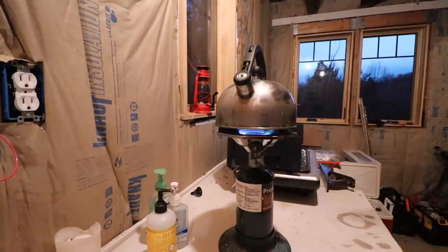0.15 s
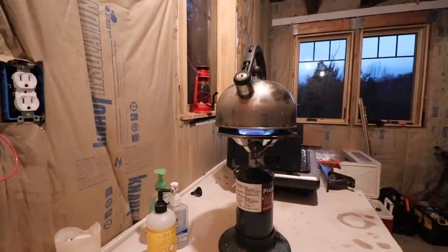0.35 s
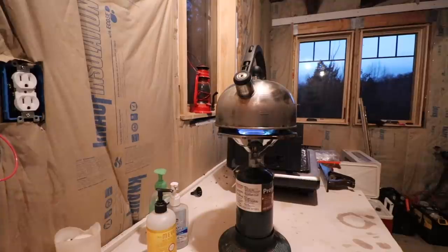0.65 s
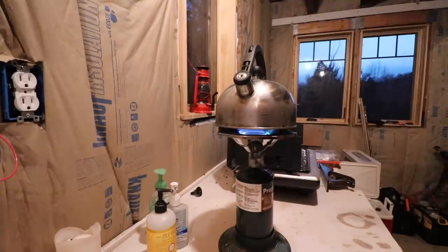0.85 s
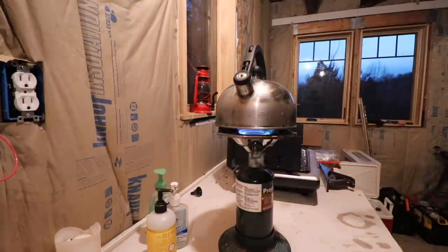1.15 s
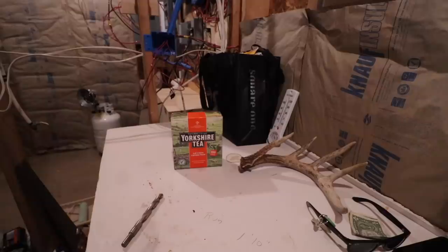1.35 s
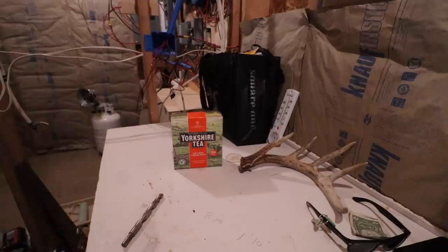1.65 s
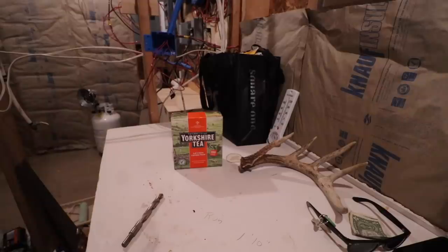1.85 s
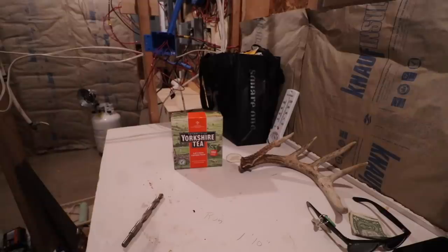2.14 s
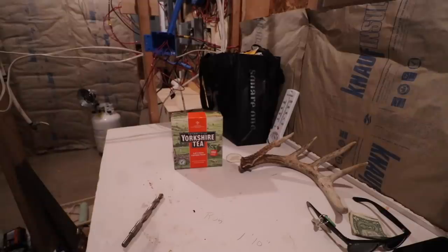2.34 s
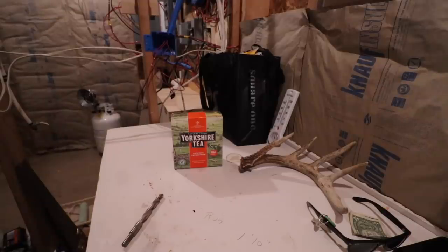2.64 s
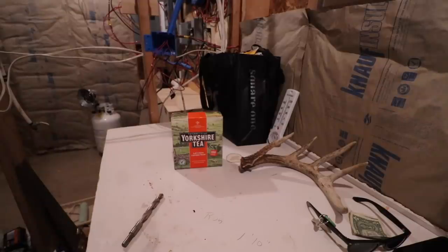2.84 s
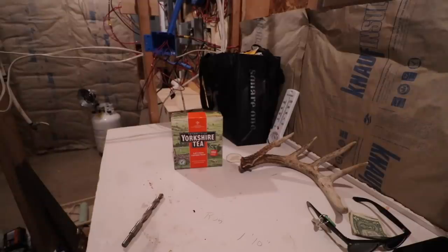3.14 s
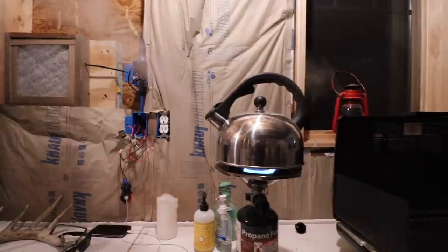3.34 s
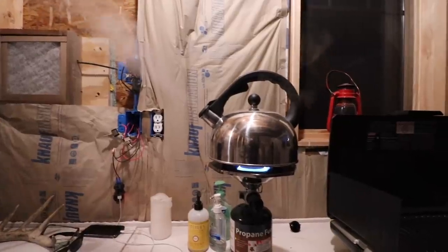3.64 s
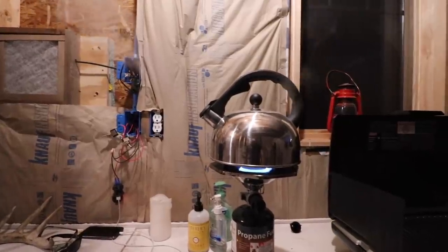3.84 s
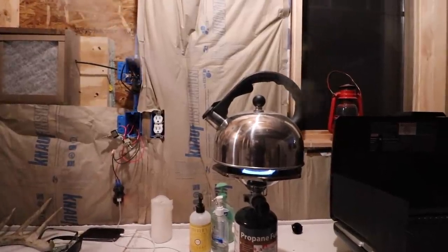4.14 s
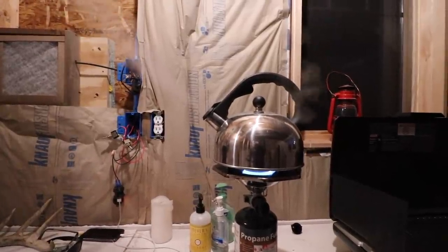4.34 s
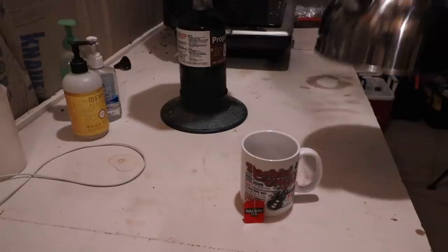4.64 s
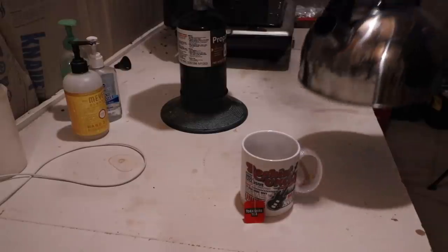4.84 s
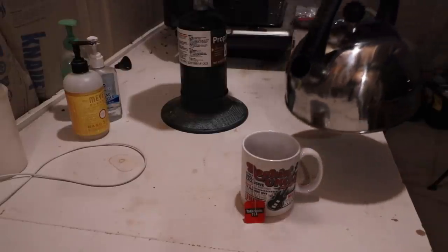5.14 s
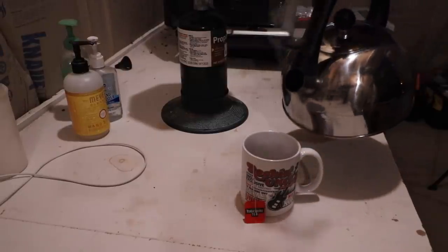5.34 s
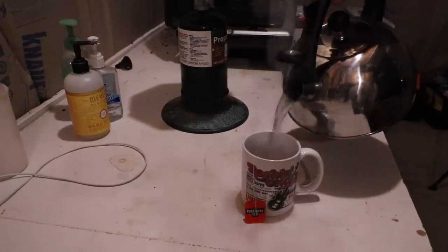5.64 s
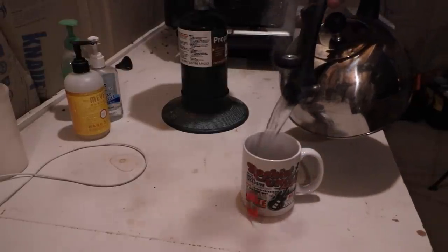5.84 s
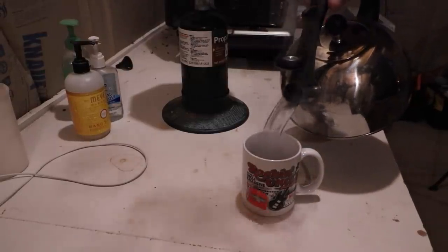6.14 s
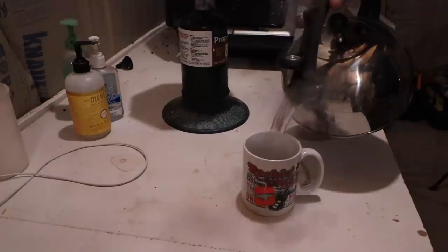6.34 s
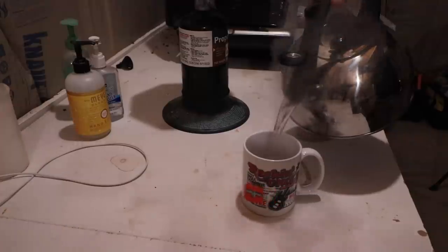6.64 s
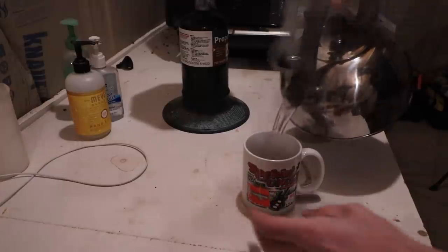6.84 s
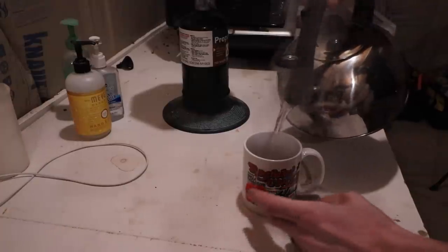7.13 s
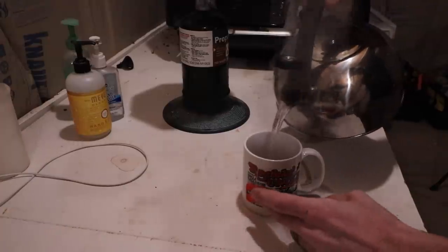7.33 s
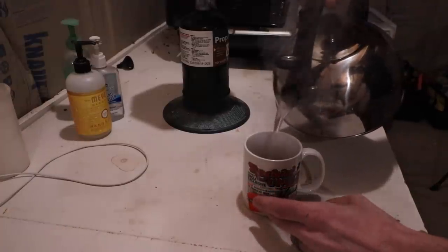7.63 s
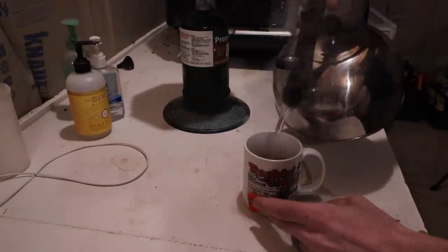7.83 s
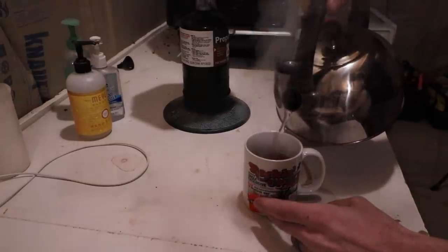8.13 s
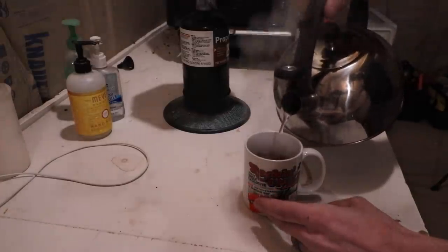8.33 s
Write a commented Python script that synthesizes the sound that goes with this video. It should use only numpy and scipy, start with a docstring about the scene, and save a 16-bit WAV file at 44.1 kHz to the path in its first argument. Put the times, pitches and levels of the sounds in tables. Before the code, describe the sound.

A gas burner roars, a kettle whistles shrilly, then sizzles as hot water is poured gurgling into a mug.

```python
"""A gas flame roars under a steel kettle, first close by, then from across the table in a padded cabin.
The swirling flame flutters in the bass while the gas jet hisses. Next the kettle boils, and steam
sings a wavering whistle in the spout cap. Last, the hot kettle sizzles, spits steam as it tips and
fills a mug: bubbles gurgle and plop, rising in pitch as the air space above the water gets shorter.
Dull knocks come through the table and the mug. The sound is in stereo."""
import sys
import numpy as np
from scipy import signal
from scipy.fft import rfft, irfft, next_fast_len
from scipy.io import wavfile
from scipy.ndimage import uniform_filter1d, map_coordinates

SR = 44100
rng = np.random.default_rng(int(sys.argv[2]) if len(sys.argv) > 2 else 0)


def int16_out(signal):
    """Quantize to a 16-bit WAV file."""
    q = np.round(np.clip(np.atleast_2d(signal).T, -1, 1) * 32767)
    wavfile.write(sys.argv[1], SR, q.astype(np.int16))


N = 373968

# When the far flame, the boil and the pouring part begin: start_s
PART_STARTS = [1.33, 3.333, 4.69]
# Tone colours, or how strong each noise is from bass to treble: pitch_hz, level_db
MURMUR_COLOUR = [(20, -8), (60, -2.5), (160, -1), (320, -4.5), (1500, -41)]
NEAR_FLAME_COLOUR = [(20, -25), (116, 0), (324, -1.5), (428, -11), (909, -12), (2040, -27.5), (2380, -21.5),
                     (2770, -27), (3010, -22), (4840, -23.5), (6750, -25), (7980, -27.5), (15600, -40)]
FAR_FLAME_COLOUR = [(20, -18.5), (122, -0.5), (259, -1), (466, -18), (688, -7.5), (1820, -20.5),
                    (3560, -21), (3870, -19.5), (5720, -18), (6570, -23.5), (7760, -20.5), (9180, -28),
                    (12100, -40.5), (15600, -37.5)]
SIZZLE_COLOUR = [(20, -23.5), (259, -6), (492, -6), (860, -11), (1460, -11), (2100, -12.5), (3180, -8),
                 (9700, -7.5), (15600, -19)]
SPIT_COLOUR = [(300, -14), (900, -11.5), (1650, -1), (2170, -13.5), (2550, 0), (3900, -3), (5500, -13),
               (10000, -9.5), (13000, -29)]
STEAM_COLOUR = [(20, -28.5), (130, -8), (270, -1.5), (500, -12), (1000, -15), (1700, -20.5), (2200, -9),
                (3000, -19), (3900, -7.5), (4900, -1.5), (6000, -19), (8000, -14), (10500, -26.5),
                (13000, -31), (14000, -62)]
# Pitches at which the jet and the kettle ring: pitch_hz, width_hz, boost_db
NEAR_FLAME_RINGS = [(3690, 60, 3.1), (5330, 127, 9.3), (5470, 120, 6), (5560, 80, 8.6), (7640, 540, 7.6),
                    (8270, 510, 8.4), (9750, 340, 8.4), (11860, 360, 11)]
FAR_FLAME_RINGS = [(572, 418, 11.8), (3850, 240, 8.6), (4480, 130, 7), (5750, 370, 4.5), (7840, 230, 7.6),
                   (10200, 200, 9.2), (12100, 750, 15.2)]
SIZZLE_RINGS = [(814, 220, 9.5), (1270, 190, 6), (1664, 37, 13), (1795, 60, 10), (2504, 170, 7.5),
                (2820, 90, 5.5), (3010, 110, -2), (4130, 870, 4), (8060, 4300, 4)]
STEAM_RINGS = [(714, 60, 9.4), (1399, 170, 9.9)]
# How alike left and right sound: pitch_hz, likeness (1 means the same)
NEAR_LIKENESS = [(60, 1), (640, 0.94), (1400, 0.39), (3100, 0.5), (15000, 0.055)]
FAR_LIKENESS = [(60, 0.99), (700, 0.95), (1400, 0.44), (3000, 0.2), (15000, .05)]
STEAM_LIKENESS = [(60, 0.99), (500, 1), (8000, 0.065)]
POUR_LIKENESS = [(60, 0.75), (380, 0.58), (2380, 0.44), (15000, 0.052)]
# Loudness of the cabin's murmur: time_s, level_db
MURMUR_LEVELS = [(4.69, -61), (6.3, -60.5), (7, -56), (8.48, -62)]
# Knocks through table and mug: start_s, level_db, pitch_hz, edge_db (added to level_db)
KNOCKS = [(4.691, -5.5, 276, -31), (4.737, -15.5, 245, -33), (4.752, -15.5, 322, -37),
          (4.763, -14.5, 261, -36), (4.773, -19, 179, -28), (6.578, -31, 334, -2), (6.661, -20, 367, -8),
          (6.751, -21.5, 340, -4), (6.946, -24, 320, 0), (6.954, -25, 177, 1.5)]
# Spits of steam: peak_s, level_db, hold_s
SPITS = [(5.276, -41, 0.018), (5.512, -37, 0.093)]
# Two dribbles, two gushes, the thinning stream and a last trickle:
# peak_s, gurgle_db, hold_s, fall_db_per_s, spray_db, slosh_db (both added to gurgle_db)
SURGES = [(5.826, -54, 0.015, 150, 6.5, -12), (6.07, -55, 0.025, 150, 6, -3),
          (6.21, -47, 0.045, 200, 1, -5), (6.315, -51, 0.075, 70, 6.5, 2.5),
          (6.473, -57.5, 0.081, 12, 3, 4.5), (7.518, -55, 0.035, 26, -8, -11)]
# The loudest single drops: start_s, splat_db, bubble_db, bubble_hz
DROPS = [(5.828, -24, -35.5, 790), (5.838, -28, -34, 800), (5.857, -30, -42, 850), (6.085, -23, -29, 2950),
         (6.1216, -42.5, -31, 830), (6.135, -37, -33, 850), (6.22, -15.5, -30, 990), (6.232, -24, -26, 900),
         (6.238, -23.5, -38, 930), (6.2866, -24.5, -25.5, 720), (6.314, -34, -36, 920),
         (6.3274, -30, -31, 3030), (6.341, -21, -26.5, 1110), (6.368, -23, -30, 1010),
         (6.379, -26, -30, 2900), (6.387, -32, -37, 2620), (6.413, -30, -27.5, 3250),
         (6.496, -45, -36, 1010), (6.548, -36, -47, 2900), (6.636, -42, -29, 3940), (6.5767, -34, -34, 880),
         (6.585, -38, -28.5, 1210), (6.674, -36, -39, 990), (6.7708, -26, -37, 2880),
         (6.9348, -34, -35, 1280), (7.387, -30, -40.5, 1620), (7.502, -40, -39, 1640),
         (7.523, -44, -42, 1670), (7.592, -43, -38, 1470), (7.653, -46, -36, 1700), (7.774, -38, -36, 1670),
         (8.1868, -35, -40.5, 1660)]
# The whistle's wavering note: time_s, pitch_hz
WHISTLE_PITCH = [(3.34, 4351), (3.43, 4415), (3.462, 4440), (3.496, 4415), (3.645, 4355), (3.825, 4438),
                 (3.88, 4406), (4.048, 4368), (4.1, 4400), (4.208, 4390), (4.234, 4410), (4.26, 4400),
                 (4.34, 4410), (4.395, 4350), (4.59, 4394), (4.63, 4428), (4.68, 4410)]
# Fainter notes above it: pitch_multiple, relative_db
OVERTONES = [(2, -21), (3, -41.5)]
# Brief dips in the whistle: middle_s, depth_db, half_length_s
WHISTLE_DIPS = [(3.455, 5.5, 0.014), (3.695, 1.5, 0.022), (3.746, 9.5, 0.0039), (3.817, 9.5, 0.0047),
                (4.233, 5, 0.0047), (4.306, 5.5, 0.0045), (4.564, 2.5, 0.017), (4.662, 13.5, 0.0035)]
# The steam plume swings left: time_s, left_over_right_db
WHISTLE_PAN = [(3.83, 0), (3.89, 2.7), (4.68, 4)]
# The spout's lower note flares up: middle_s, peak_db, half_length_s
LOW_NOTE_FLARES = [(3.404, -49.5, 0.017), (3.814, -51.5, 0.01), (3.92, -41.5, 0.014), (4.264, -57, 0.015)]

FAR_S, BOIL_S, POUR_S = PART_STARTS
EMPTY_HZ, FULL_HZ, FILL_S = 820, 1660, (5.9, 7.42)  # the mug's note, and when it climbs
SPRAY_HZ, SPATTER_HZ, SLOSH_HZ = (2950, 4250, 2650), 6800, 1310  # small, tiny and big torn bubbles
WHISTLE_DB, LOW_NOTE_DB, LOW_NOTE_HZ = -25, -62, 2462


def amp(db):
    """Turn decibels into a gain to multiply by."""
    return 10 ** (np.asarray(db) / 20)


def unit(x):
    """Scale a sound to an average power of 1."""
    return x / np.sqrt(np.mean(x ** 2) + 1e-20)


def along(points, hz):
    """Read between the rows of a table of pitches."""
    pitches, values = np.transpose(points)
    return np.interp(np.log(hz + 1), np.log(pitches + 1), values)


def curve(rows):
    """Join timed points with straight lines, one value per sample."""
    return np.interp(np.arange(N) / SR, *np.transpose(rows))


def wobble(rate):
    """A smooth curve through rate random points a second."""
    return map_coordinates(rng.standard_normal(int(N * rate / SR) + 4), [np.arange(N) * rate / SR])


def between(start, end, fade_s):
    """1 from start to end, with short fades."""
    t = np.arange(N) / SR
    return np.clip((t - start) / fade_s + .5, 0, 1) * np.clip((end - t) / fade_s + .5, 0, 1)


def swell(peak_s, db, hold_s, rise, fall):
    """A gain that climbs to db, holds, then sinks; rise and fall are in dB a second."""
    t = np.arange(N) / SR - peak_s
    return amp(db - rise * np.maximum(-t, 0) - fall * np.maximum(t - hold_s, 0))


def bump(middle_s, half_s):
    """A short bell-shaped curve."""
    return np.exp(-((np.arange(N) / SR - middle_s) / half_s) ** 2)


def filtered(x, response):
    """Scale each pitch in x by response(hz)."""
    size = next_fast_len(x.shape[-1] + 8192)
    return irfft(rfft(x, size) * response(np.fft.rfftfreq(size, 1 / SR)), size)[..., :x.shape[-1]]


def rush(start, end, colour, rings, likeness, patchy_db, lag_ms, pan_db, ripple_db=3.0):
    """Rushing stereo noise with random louder patches; the left side is later and duller."""
    first, last = max(int((start - .1) * SR), 0), min(int((end + .1) * SR), N)
    grid = signal.stft(rng.standard_normal((2, last - first)), nperseg=512)[2]  # by pitch and time
    patches = uniform_filter1d(uniform_filter1d(rng.standard_normal(grid.shape[1:]), 8, 0), 8, 1)
    noise = signal.istft(grid * amp(patchy_db * unit(patches)), nperseg=512)[1][:, :last - first]
    standing_waves = rng.standard_normal(SR // 2)  # the cabin favours some pitches over others
    ripple = lambda hz: ripple_db * map_coordinates(standing_waves, [hz / 24]) * hz / (hz + 400)
    ringing = lambda hz: sum(db / (1 + (2 * (hz - pitch) / width) ** 2) for pitch, width, db in rings)
    gain = lambda hz: amp(along(colour, hz) + ripple(hz) + ringing(hz))
    spread = lambda hz: np.arccos(np.clip(along(likeness, hz), -1, 1)) / 2
    mid, side = filtered(noise, lambda hz: gain(hz) * [np.cos(spread(hz)), np.sin(spread(hz))])
    shade = lambda hz: amp(pan_db / 2 * hz ** 2 / (hz ** 2 + 900 ** 2))
    left = lambda hz: shade(hz) * np.exp(-1j * np.pi * hz * lag_ms / 1000)
    stereo = filtered(np.array([mid + side, mid - side]), lambda hz: np.array([left(hz), 1 / left(hz)]))
    return np.pad(unit(stereo), ((0, 0), (first, N - last)))


def pings(start_s, hz, db, cycles, rise, samples, sharp=25):
    """Short fading notes; rise bends the pitch up, as when a bubble nears the surface."""
    steps = np.arange(samples)
    age = steps / SR * hz[:, None] / cycles
    waves = amp(db)[:, None] * np.sin(2 * np.pi * cycles * age * (1 + rise * age))
    waves = waves * np.exp(-3 * age) * (1 - np.exp(-sharp * age))
    places = np.round(start_s * SR).astype(int)[:, None] + steps
    return np.bincount(places.ravel(), waves.ravel(), N + SR)[:N]


def cabin_echo(x, echo_db, decay_s=.1):
    """The padded walls add a short wash of echoes, different on each side."""
    t = np.arange(SR // 3) / SR
    tail = rng.standard_normal((2, len(t))) * amp(-60 * t / decay_s) * (t > .004)
    return x + amp(echo_db) * signal.fftconvolve(x, tail / np.linalg.norm(tail[0]), axes=1)[:, :N]


def cabin_murmur():
    """The cabin's low murmur under the pouring."""
    noise = rush(POUR_S, N / SR, MURMUR_COLOUR, [], POUR_LIKENESS,
                 patchy_db=1.5, lag_ms=0.045, pan_db=-5.5)
    return amp(curve(MURMUR_LEVELS)) * noise


def knocks():
    """Soft knocks briefly ring the table top; one bright tick comes as a hand meets the mug."""
    start_s, db, hz, edge_db = np.transpose(KNOCKS)
    thuds = pings(start_s, hz, db, cycles=2.84, rise=-0.04, samples=1500, sharp=0.91)
    edges = pings(start_s, np.full_like(hz, 1000), db + edge_db, cycles=0.83, rise=0, samples=400)
    tick_age_s = np.arange(N) / SR - 6.7365
    tick = rng.standard_normal(N) * (tick_age_s > 0) * amp(-40 - 60 * np.abs(tick_age_s) / 0.062)
    return cabin_echo(np.array([thuds + edges + tick] * 2), echo_db=-9)


def sizzle():
    """The hot kettle sizzles, fading as the steel cools."""
    cooling = swell(POUR_S, db=-43.5, hold_s=0, rise=0, fall=1.08)
    return cooling * rush(POUR_S, N / SR, SIZZLE_COLOUR, SIZZLE_RINGS, POUR_LIKENESS,
                          patchy_db=2.0, lag_ms=0.048, pan_db=-1.5, ripple_db=1.0)


def spout_hiss(pitch_hz=2430, width_hz=130):
    """The last steam rings the spout, swelling as the kettle tips, then sinking to a faint hiss."""
    spout = lambda hz: 1j * hz * width_hz / (pitch_hz ** 2 - hz * hz + 1j * hz * width_hz)
    level = swell(peak_s=5.39, db=-54, hold_s=0, rise=13, fall=9) + amp(-61.5)
    return level * unit(filtered(rng.standard_normal((2, N)), spout))


def spits():
    """Water flashes to steam on the hot spout, twice."""
    noise = rush(POUR_S, FILL_S[0] + .5, SPIT_COLOUR, [], POUR_LIKENESS,
                 patchy_db=1.5, lag_ms=0.021, pan_db=-1.5, ripple_db=2.0)
    sputter = amp(0.6 * wobble(250) + 0.63 * wobble(25))
    return noise * sputter * sum(swell(*spit, rise=200, fall=114) for spit in SPITS)


def steam():
    """A low flame and escaping steam rush at the boil."""
    return amp(-45.5) * rush(BOIL_S, POUR_S, STEAM_COLOUR, STEAM_RINGS, STEAM_LIKENESS,
                             patchy_db=1.5, lag_ms=0.0091, pan_db=-0.5)


def burner():
    """The swirling flame flutters in the bass over a steady jet hiss, first near, then far."""
    near = amp(-39) * rush(0, FAR_S, NEAR_FLAME_COLOUR, NEAR_FLAME_RINGS, NEAR_LIKENESS,
                           patchy_db=1.5, lag_ms=0.037, pan_db=-1.0)
    far = amp(-38) * rush(FAR_S, BOIL_S, FAR_FLAME_COLOUR, FAR_FLAME_RINGS, FAR_LIKENESS,
                          patchy_db=1.0, lag_ms=0.21, pan_db=-4.5, ripple_db=2.0)
    flame = near * between(-1, FAR_S, 0.022) + far * between(FAR_S, BOIL_S, 0.014)
    bass = filtered(flame, lambda hz: 1 / (1 + (hz / 1100) ** 4))
    flutter = amp(0.71 * wobble(30.18) + 0.5 * wobble(5.78))
    return flame + bass * (flutter - 1)


def mug_note(time_s):
    """The air above the water gets steadily shorter, so its pitch climbs."""
    return 1 / np.interp(time_s, FILL_S, (1 / EMPTY_HZ, 1 / FULL_HZ))


def stream(count=3600, rise=300):
    """Surges of water make bubbles that gurgle near the mug's note, slosh, and spray above it."""
    uneven = amp(1.2 * wobble(45))
    flow = splash = churn = 0
    for peak_s, db, hold_s, fall, spray_db, slosh_db in SURGES:
        flow += swell(peak_s, db, hold_s, rise, fall)
        splash += swell(peak_s, db + spray_db, hold_s, rise, fall)
        churn += swell(peak_s, db + slosh_db, hold_s, rise, fall)
    detune, size = rng.standard_normal((count, 2)).T
    size_db = 2 * np.clip(size, -2, 2.5)
    start_s = rng.uniform(POUR_S, N / SR, count)
    mug_hz = mug_note(start_s)
    gurgle_hz = mug_hz * np.exp(mug_hz / 13000 * detune)  # a fuller mug holds the pitch less tightly
    spray_hz = np.resize(SPRAY_HZ, count) * np.exp(.1 * detune)
    spatter_hz = SPATTER_HZ * np.exp(.25 * detune)
    slosh_hz = SLOSH_HZ * np.exp(.33 * detune)
    gurgle = pings(start_s[::3], gurgle_hz[::3], .29 * size_db[::3], cycles=9.3, rise=.036, samples=800)
    spray = pings(start_s, spray_hz, .6 * size_db, cycles=10, rise=.05, samples=360)
    spatter = pings(start_s[1::7], spatter_hz[1::7], size_db[1::7], cycles=2.4, rise=0, samples=60)
    slosh = pings(start_s[2::4], slosh_hz[2::4], 1.1 * size_db[2::4], cycles=4.5, rise=.1, samples=500)
    water = flow * unit(gurgle) + churn * unit(slosh) + splash * (unit(spray) + amp(-3) * unit(spatter))
    sounding_share = 1 - POUR_S * SR / N
    return water * uneven * np.sqrt(sounding_share)


def drops():
    """Each drop splats, makes a bubble and rings the mug's air, most when close to its note."""
    start_s, splat_db, bubble_db, bubble_hz = np.transpose(DROPS)
    splat_hz = 2550 * np.exp(0.045 * rng.standard_normal(len(start_s)))
    mug_hz = mug_note(start_s)
    ring_db = bubble_db - 8 - 9 * np.abs(np.log2(bubble_hz / mug_hz))
    plops = pings(start_s, bubble_hz, bubble_db, cycles=7.5, rise=.03, samples=1000)
    rings = pings(start_s, mug_hz, ring_db, cycles=19, rise=0, samples=2000, sharp=12)
    clicks = pings(start_s, splat_hz, splat_db, cycles=3.2, rise=0, samples=160, sharp=18)
    ticks = pings(start_s, 2.5 * splat_hz, splat_db - 9, cycles=1.3, rise=0, samples=100)
    return plops + rings + clicks + ticks


def pour():
    """The stream and the drops land in the mug, a little to the right."""
    water = stream() + drops()
    stereo = np.array([np.roll(water, shift=2), water]) * amp([[-.9], [.9]])
    return cabin_echo(stereo, echo_db=-8)


def echoed_tone(phase, depth, rate):
    """A tone that flickers at random on each side, as when wall echoes add up and cancel."""
    echoes = np.array([wobble(rate) + 1j * wobble(rate) for side in range(2)])
    return ((1 + depth * echoes) * np.exp(1j * phase)).imag


def whistle():
    """Steam sings in the spout cap: an unsteady note, its overtones and a faint lower note."""
    db = WHISTLE_DB - sum(depth * bump(s, half) for s, depth, half in WHISTLE_DIPS)
    phase = 2 * np.pi * np.cumsum(curve(WHISTLE_PITCH) + 6.5 * wobble(65) + 8 * wobble(330)) / SR
    low_gain = amp(LOW_NOTE_DB + 2.2 * wobble(25))
    low_gain += sum(amp(peak) * bump(s, half) ** 2 for s, peak, half in LOW_NOTE_FLARES)
    wander_hz = 55 * np.minimum(amp(LOW_NOTE_DB) / low_gain, 1)  # louder means a firmer pitch
    low_gain *= amp(1.5 * wobble(70))
    low_phase = 2 * np.pi * np.cumsum(LOW_NOTE_HZ + wander_hz * wobble(120)) / SR
    tone = amp(db + 0.7 * wobble(220)) * echoed_tone(phase, depth=0.12, rate=60)
    for multiple, relative_db in OVERTONES:
        tone += amp(db + relative_db) * echoed_tone(multiple * phase, depth=0.55, rate=130)
    # The two notes mix, making extra tones at sums and differences of their pitches.
    mixed = (amp(-6) * np.sin(phase + low_phase) + amp(-10) * np.sin(2 * phase - low_phase)
             + amp(-13) * np.sin(phase - low_phase))
    left_db = curve(WHISTLE_PAN) / 2
    return np.sqrt(2) * (tone * amp([left_db, -left_db]) + low_gain * (np.sin(low_phase) + mixed))


def scene():
    """The flame, then the boil, then the pouring."""
    sound = burner()
    sound += (whistle() + steam()) * between(BOIL_S, POUR_S, 0.011)
    sound += knocks()
    sound += (sizzle() + spits() + spout_hiss() + cabin_murmur()) * between(POUR_S, 9, 0.012)
    return sound + pour()


def record(dry, top_hz=15730):
    """Cut away the very highest treble."""
    return filtered(dry, lambda hz: hz < top_hz)


dry = scene()
out = record(dry)
int16_out(out)
```